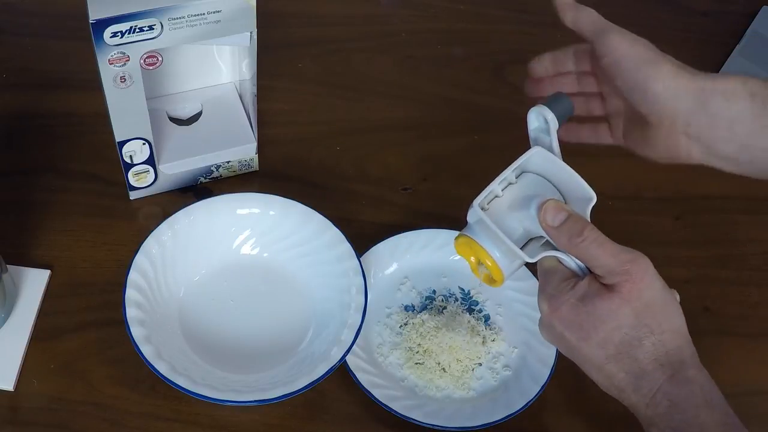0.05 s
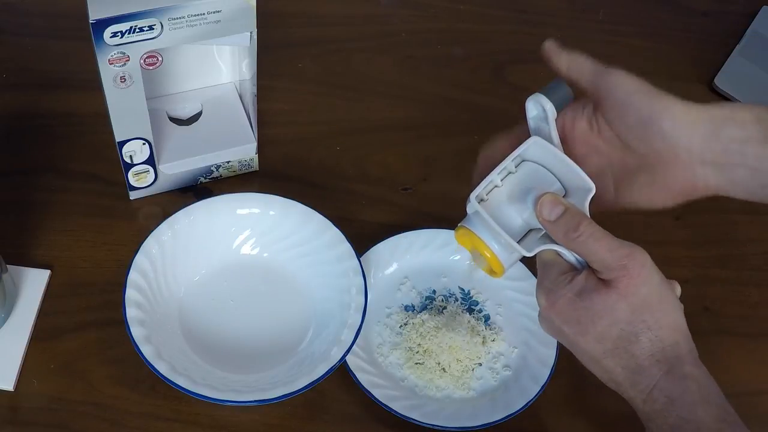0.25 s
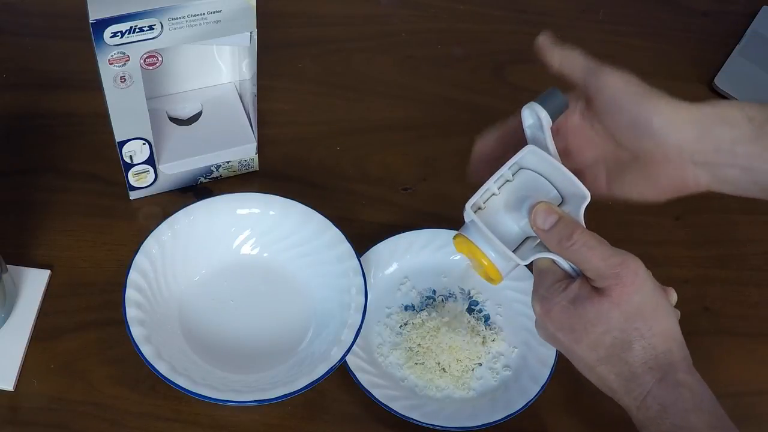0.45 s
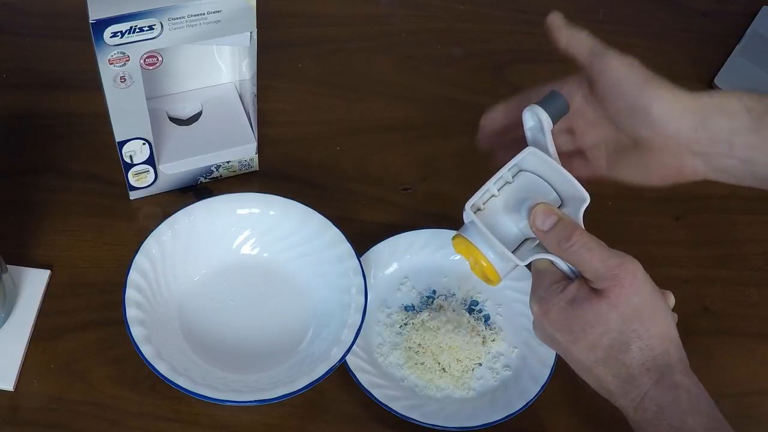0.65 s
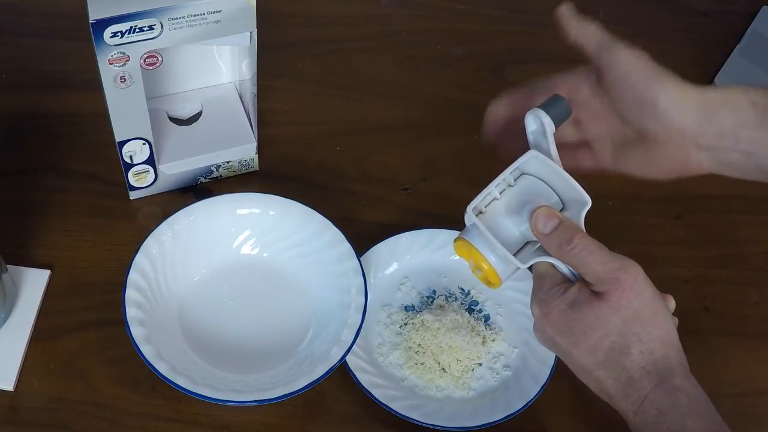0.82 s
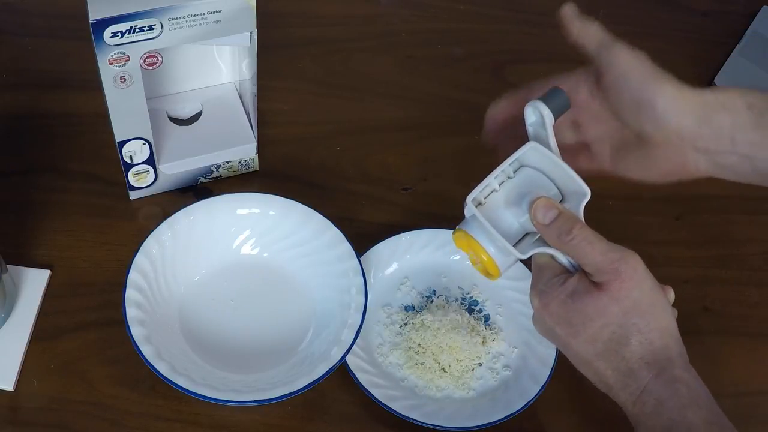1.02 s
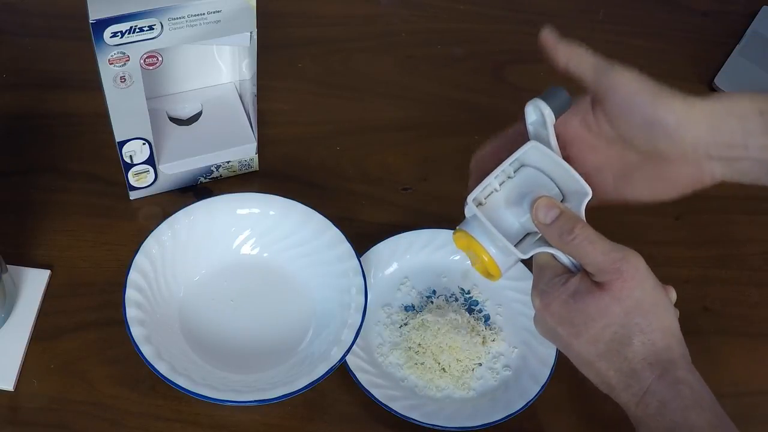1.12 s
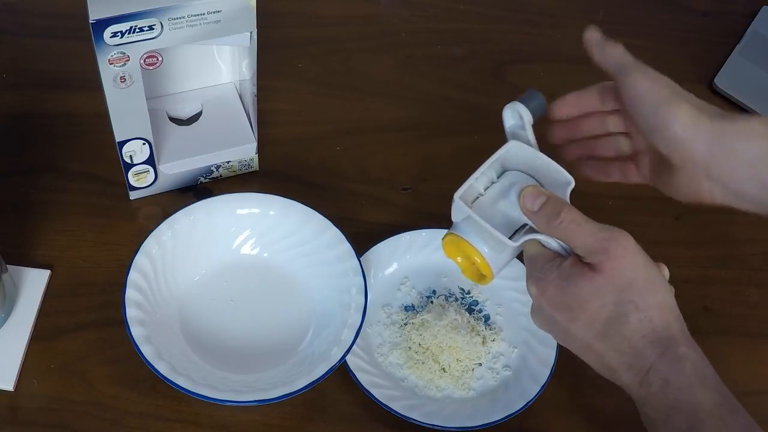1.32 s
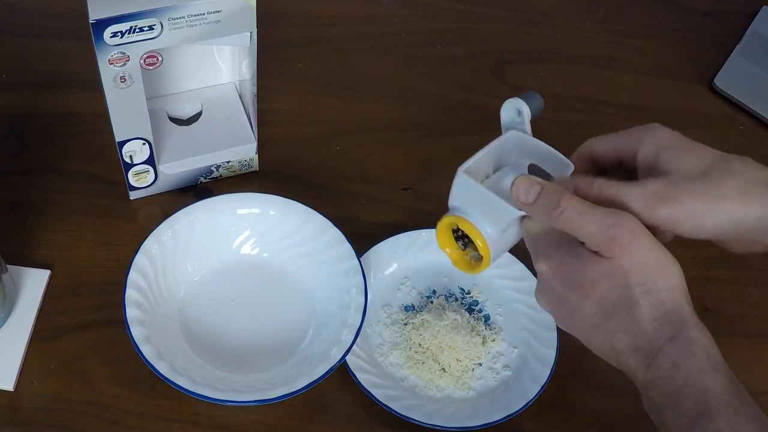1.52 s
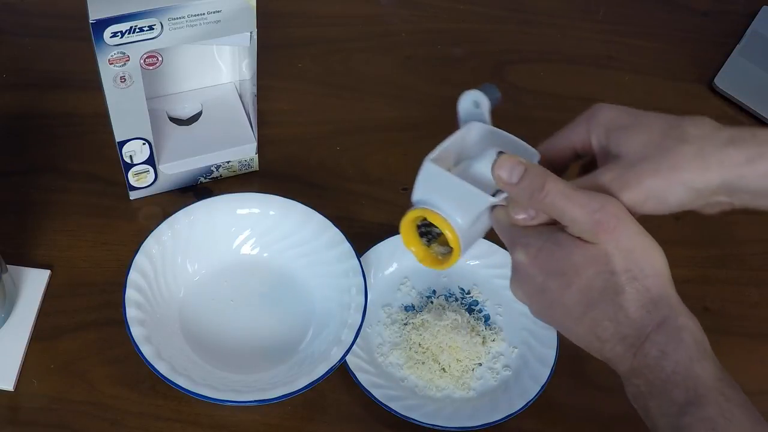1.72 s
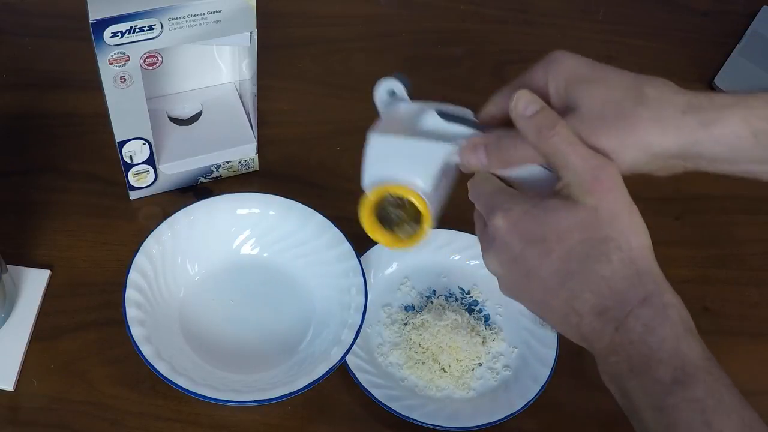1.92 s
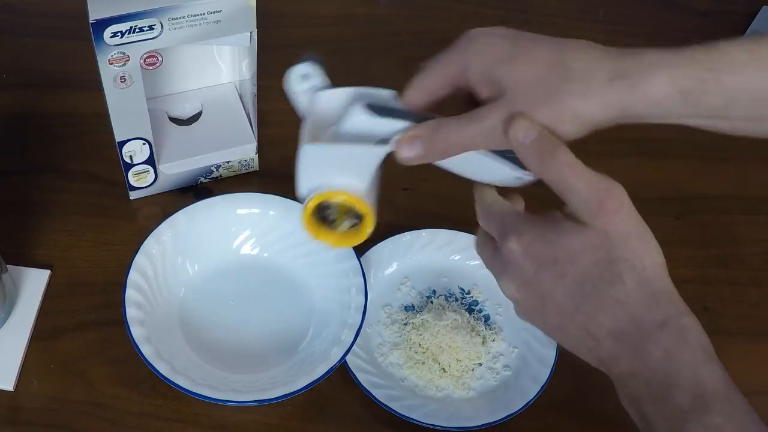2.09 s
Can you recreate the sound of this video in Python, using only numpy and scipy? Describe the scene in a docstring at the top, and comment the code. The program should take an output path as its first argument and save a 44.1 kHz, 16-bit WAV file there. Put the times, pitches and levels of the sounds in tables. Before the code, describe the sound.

A plastic rotary cheese grater is patted six times, close by, quickly and evenly from about 0.2 to 1.1 seconds. Each pat gives a knock, a soft puff of air and a sharp clack of the loose drum, ringing faintly. From 1.4 to 2 seconds the handle rattles more quietly, with a dull knock and soft finger rubbing. A small room echoes over faint background noise.

```python
"""Over faint room noise, a hand pats a plastic rotary cheese grater six times, close by, above a plate.
Each pat brushes and knocks the housing and pushes a puff of air; a moment later the loose drum clacks
against its seat. Then the grater is turned over: fingers rub, the hinged handle rattles in the hollow
hopper and the hand takes hold with a dull knock. A small, lively room echoes the knocks and rattles."""
import sys
import numpy as np
from scipy import signal
from scipy.fft import rfft, irfft
from scipy.io import wavfile
from scipy.ndimage import uniform_filter1d

SR = 44100
rng = np.random.default_rng(int(sys.argv[2]) if len(sys.argv) > 2 else 0)


def to_wav(s):
    """Save 16-bit WAV."""
    ch = np.atleast_2d(s).T  # columns
    pcm = np.round(np.clip(ch, -1, 1) * 32767)  # PCM
    wavfile.write(sys.argv[1], SR, pcm.astype(np.int16))


N = 94815
T = np.arange(int(.7 * SR)) / SR  # seconds since a sound began


def gain(db):
    """Turn decibels into a multiplier."""
    return 10 ** (np.asarray(db) / 20)


def unit(x):
    """Scale a sound to an average (rms) level of 1."""
    return x / np.sqrt(np.mean(x ** 2))


def pan(left_minus_right_db):
    """Left and right gains; negative leans right."""
    return gain(np.array([[left_minus_right_db], [-left_minus_right_db]]) / 2)


def widen(a, b, likeness):
    """Make left and right from two unrelated sounds; likeness 1 makes them equal."""
    return np.sqrt((1 + likeness) / 2) * a + np.sqrt((1 - likeness) / 2) * b * np.array([[1], [-1]])


def add(out, start_s, x):
    """Mix a sound in at its start time."""
    i = int(start_s * SR)
    out[i:i + len(x)] += x[:max(N - i, 0)]


def fade(fade_s, rise_s):
    """Rise quickly, then fall by 60 dB every fade_s."""
    return np.minimum(T / rise_s, 1) * np.exp(-np.log(1000) * np.maximum(T - rise_s, 0) / fade_s)


def shade(x, colour):
    """Filter a sound by a colour: a list of (pitch_hz, level_db) points."""
    hz, db = np.array(colour).T
    f = np.maximum(np.fft.rfftfreq(2 * len(x), 1 / SR), 1)
    curve_db = np.interp(np.log(f), np.log(hz), db)
    return irfft(rfft(x, 2 * len(x)) * gain(curve_db))[:len(x)]


def noise(colour):
    """Steady coloured noise, as long as the scene."""
    return unit(shade(rng.standard_normal(N), colour))


def burst(colour, fade_s, rise_s, smooth_bins=400):
    """Fading noise, its spectrum evened out and then coloured."""
    envelope = fade(fade_s, rise_s)
    spectrum = rfft(rng.standard_normal(len(T)) * envelope, 2 * len(T))
    power = uniform_filter1d(abs(spectrum) ** 2, smooth_bins)
    even = irfft(spectrum / np.sqrt(power + 1e-9))[:len(T)]
    return unit(shade(even, colour)) * np.sqrt(np.mean(envelope ** 2))


def ring(tones, rise_s, pitch=1):
    """A struck object's fading tones; neighbours swing in opposite directions."""
    phase = rng.random()
    out = sum((-1) ** k * gain(db) * fade(fade_s, rise_s) * np.sin(2 * np.pi * (hz * pitch * T + phase))
              for k, (hz, db, fade_s) in enumerate(tones))
    return out / np.sqrt(sum(gain(db) ** 2 for _, db, _ in tones))


def contact(x, brightness, spot_hz, lift_db, pivot_hz, octaves):
    """Harder contact brightens a blow; the spot that is struck lifts one band of pitches."""
    f = np.maximum(np.fft.rfftfreq(2 * len(x), 1 / SR), 1)
    tilt_db = brightness * np.log2(np.hypot(f, 700) / pivot_hz)
    spot_db = lift_db * np.exp(-(np.log2(f / spot_hz) / octaves) ** 2)
    return irfft(rfft(x, 2 * len(x)) * gain(tilt_db + spot_db))[:len(x)]


# The colour of the quiet room: pitch_hz, level_db
BACKGROUND = [(20, 3.5), (60, -7), (150, -10.5), (330, -11), (500, -11.5), (750, -17), (1300, -18.5),
              (2000, -20), (5700, -26.5), (14500, -31), (15400, -53)]
def room_noise():
    """A faint, steady rumble and hiss from all around."""
    return gain(-65) * widen(noise(BACKGROUND), noise(BACKGROUND), likeness=.11)


# The hand's pats: start_s, level_db, brightness_db_per_octave, spot_hz, lift_db, brush_db, puff_db
PATS = [(.2422, -23, -0.5, 1780, 7, -39, -43.5), (0.4278, -33, -0.5, 1430, 8.5, -40.5, -44.5),
        (.5955, -36, 0, 1500, 1, -43.5, -47.5), (.7620, -31.5, 0, 1360, 5, -41.5, -42),
        (.9360, -25.5, 1, 1340, 11, -41, -41.5), (1.1018, -34, 1.5, 1340, 5, -35.5, -39)]
# The tones of the plastic housing: pitch_hz, level_db, fade_s
HOUSING_TONES = [(358.5, -11.5, 0.016), (480, -12.5, .02), (758, -7.5, 0.012), (1097, -7.5, 0.024),
                 (1340, -2.5, 0.0096), (1536, -1.5, 0.0059), (1960, -10, 0.011), (2310, -13, 0.004),
                 (3900, -8, 0.016)]
# The colour of skin meeting plastic: pitch_hz, level_db
SKIN_COLOUR = [(150, -10), (600, -6), (1500, 3.5), (3000, 1.5), (6000, -6), (12000, -2), (16000, -18)]
PAT_RISE_S, BRUSH_LEAD_S = .00062, .003
def pats():
    """Skin brushes the housing, then knocks it and makes it ring."""
    out = np.zeros(N)
    for start_s, db, brightness, spot_hz, lift_db, brush_db, _ in PATS:
        knock = ring(HOUSING_TONES, PAT_RISE_S)
        knock += gain(-6.5) * burst(SKIN_COLOUR, fade_s=.022, rise_s=PAT_RISE_S)
        knock = contact(knock, brightness, spot_hz, lift_db, pivot_hz=1820, octaves=.23)
        brush = burst(SKIN_COLOUR, fade_s=.082, rise_s=BRUSH_LEAD_S)
        add(out, start_s, gain(db) * knock)
        add(out, start_s - BRUSH_LEAD_S, gain(brush_db) * brush)
    return out


# The deep tones of a puff of air: pitch_hz, level_db, fade_s
PUFF_TONES = [(27.5, -2, 0.21), (73.4, -7.5, 0.036)]
def air_puffs():
    """Each pat sends a soft, low thump of air to the microphone."""
    out = np.zeros(N)
    for start_s, *_, puff_db in PATS:
        add(out, start_s, gain(puff_db) * ring(PUFF_TONES, rise_s=.0054))
    return out


# The drum's hits: start_s, level_db, brightness_db_per_octave, pitch_ratio, spot_hz, lift_db, steel_db
CLACKS = [(0.2579, -29.5, 0, 1.0, 7160, 6, -77), (.4424, -20.5, 2, 1.01, 3810, 14.5, -48),
          (0.6062, -14.5, 1.5, 1.0, 3640, 4, -51), (0.7701, -13.5, 1.5, 1.005, 6470, 4.5, -48),
          (0.9518, -28.5, 0.5, 1.0, 3770, 13.5, -59), (1.1102, -14, 0, .99, 5480, 6.5, -60)]
# The drum's short plastic tones: pitch_hz, level_db, fade_s
DRUM_TONES = [(1664, -2, 0.0079), (2420, -13, 0.01), (2800, -2.5, 0.013), (3631, -1, 0.0066),
              (4274, -4, 0.018), (5535, -3.5, 0.01), (6050, -4.5, 0.0094), (6656, -2, 0.0072),
              (7187, -3, 0.01), (8550, -7, 0.0076), (9370, -3.5, 0.004), (13400, -15.5, 0.0061)]
# Its longer steel tones: pitch_hz, level_db, fade_s
STEEL_TONES = [(2255, 3, 0.29), (2420, -8, 0.44), (3952, -18.5, 0.52), (4016, 5.5, 1), (4060, -15, 0.24),
               (5930, 8, 0.45), (6200, -5, 0.25), (6860, -9, 0.27)]
# The colour of its sharp crack: pitch_hz, level_db
CRACK_COLOUR = [(150, -19), (900, -13), (1800, -2.5), (4000, 2), (7000, -5), (10000, -2.5), (14000, -21.5),
                (16000, -28.5)]
def drum_clacks(rise_s=.0013):
    """The loose drum strikes its seat: plastic cracks and steel rings faintly."""
    out = np.zeros(N)
    for start_s, db, brightness, pitch, spot_hz, lift_db, steel_db in CLACKS:
        clack = ring(DRUM_TONES, rise_s, pitch)
        clack += gain(-5) * burst(CRACK_COLOUR, fade_s=.0086, rise_s=rise_s)
        clack = contact(clack, brightness, spot_hz, lift_db, pivot_hz=4500, octaves=.071)
        steel = ring(STEEL_TONES, rise_s)
        add(out, start_s, gain(db) * clack + gain(steel_db) * steel)
    return out


# How loudly the fingers rub: time_s, level_db
RUB_LEVELS = [(1.3, -73), (1.438, -73.5), (1.48, -65.5), (1.56, -73), (1.66, -69.5), (1.751, -74),
              (1.86, -56), (1.96, -69.5), (2.14, -70.5)]
# The colour of the rubbing: pitch_hz, level_db
RUB_COLOUR = [(200, -21.5), (900, -31), (1280, -2.5), (1900, -12), (4000, -17), (14000, -19)]
def finger_rub():
    """Fingers slide on the grater with a soft hiss that swells and sinks."""
    time_s, db = np.array(RUB_LEVELS).T
    return noise(RUB_COLOUR) * np.interp(np.arange(N) / SR, time_s, gain(db), left=0)


# The handle's taps: start_s, hopper_db, hopper_hz, tick_db, hinge_db
RATTLES = [(1.3837, -58.5, 1300, -58.5, -68), (1.4522, -47.5, 1210, -41.5, -43.5),
           (1.465, -54, 1185, -57, -45.5), (1.4711, -38, 1190, -58, -57), (1.4877, -45.5, 1277, -41, -55),
           (1.4903, -33, 1296, -40.5, -38.5), (1.5567, -70, 1240, -42, -61), (1.574, -48.5, 1270, -61, -70),
           (1.698, -48.5, 1280, -54.5, -61), (1.786, -63, 1187, -49, -74), (1.7881, -40, 1225, -50.5, -72),
           (1.803, -45.5, 1240, -45.5, -65), (1.8405, -38, 1716, -42.5, -63),
           (1.8558, -51, 1344, -52.5, -71), (1.8619, -41.5, 1290, -51, -56),
           (1.8692, -56, 1296, -48.5, -72), (1.8847, -28.5, 1356, -37, -71),
           (1.9895, -73, 1400, -52.5, -58)]
# The colour of a dry tick: pitch_hz, level_db
TICK_COLOUR = [(200, -10), (800, -7.5), (1500, 3.5), (3000, 1.5), (5000, -2.5), (8000, -7.5),
               (13000, -10.5), (16000, -50)]
# The tones of the hopper, which holds the cheese: ratio_to_hopper_hz, level_db, fade_s
HOPPER_TONES = [(.9, -20.5, .02), (1.01, -9, 0.019), (1.3, -28.5, 0.018), (2.03, -25, .02)]
# The tones of the hinge: pitch_hz, level_db, fade_s
HINGE_TONES = [(2576, -9.5, 0.064), (2930, -1, .014), (7600, -16, 0.022)]
def handle_rattles(rise_s=.0014):
    """The handle ticks against the hollow hopper; hopper and hinge both ring."""
    out = np.zeros(N)
    for start_s, hopper_db, hopper_hz, tick_db, hinge_db in RATTLES:
        tick = gain(tick_db) * burst(TICK_COLOUR, fade_s=.01, rise_s=.00072)
        hopper = gain(hopper_db) * ring(HOPPER_TONES, rise_s, hopper_hz)
        hinge = gain(hinge_db) * ring(HINGE_TONES, rise_s)
        add(out, start_s, tick + hopper + hinge)
    return out


def grip(start_s=1.4658):
    """The housing gives a soft, dull knock as the hand closes on it."""
    out = np.zeros(N)
    knock = ring(HOUSING_TONES, PAT_RISE_S)
    dull = contact(knock, brightness=-2, spot_hz=480, lift_db=9.5, pivot_hz=1010, octaves=.75)
    add(out, start_s, gain(-40) * dull)
    return out


def direct_sound(x, lag_s=.000012):
    """Sound reaches the microphone's right opening just after its left one."""
    phase_gap = 2 * np.pi * np.fft.rfftfreq(N, 1 / SR) * lag_s
    return irfft(rfft(x) * np.exp(.5j * phase_gap * np.array([[1], [-1]])), N)


# Bounces off the table and plates: delay_s, level_db
ECHOES = [(.0056, -26.5), (.0074, -26)]
# The colour of the room's echo: pitch_hz, level_db
ECHO_COLOUR = [(100, -3), (350, 2), (600, 1), (850, 4.5), (1300, -2.5), (1800, -3), (2400, 1), (3200, -6),
               (4050, -2.5), (4900, -1), (6000, -4), (7300, -2.5), (8400, -4.5), (10000, -10.5),
               (15000, -8)]
def room_echo(x):
    """Sound bounces off the table, scatters from nearby things and dies away in the room."""
    tails = [burst(ECHO_COLOUR, fade_s=.43, rise_s=.011, smooth_bins=120) for _ in range(2)]
    scatters = [burst(ECHO_COLOUR, fade_s=.041, rise_s=.0025) for _ in range(2)]
    tail = gain(-10.5) * unit(widen(*tails, likeness=.79))
    scatter = gain(-11) * unit(widen(*scatters, likeness=.7))
    response = (tail + scatter) / np.sqrt(len(T))
    for delay_s, db in ECHOES:
        response[:, int(delay_s * SR)] += gain(db)
    return signal.fftconvolve(x[None], response, axes=1)[:, :N]


def scene():
    """Room noise, the echoing grater near the middle, and air puffs to the right."""
    background = room_noise()
    grater = pats() + drum_clacks() + grip() + handle_rattles() + finger_rub()
    in_room = direct_sound(grater) + room_echo(grater)
    return background + in_room * pan(-.7) + air_puffs() * pan(-12)


def record(dry):
    """The recorder cuts the highest treble."""
    top_hz = 15200
    return signal.sosfilt(signal.ellip(8, .2, 70, top_hz, fs=SR, output="sos"), dry)


dry = scene()
out = record(dry)
to_wav(out)
```